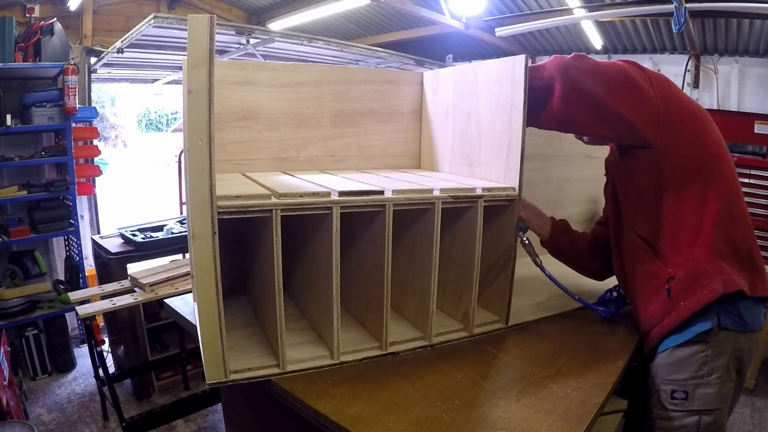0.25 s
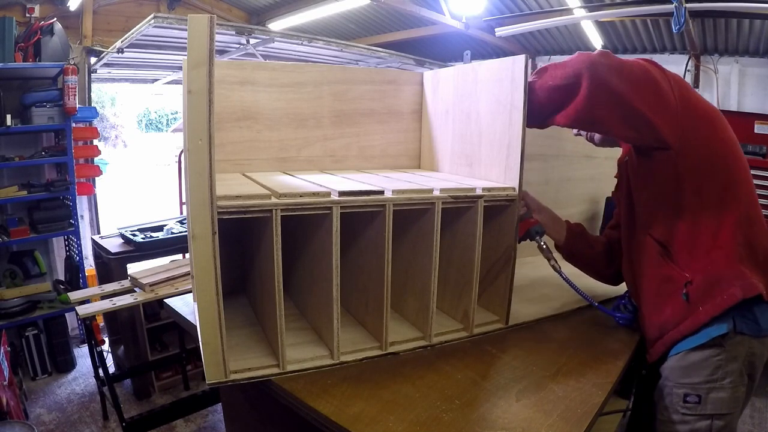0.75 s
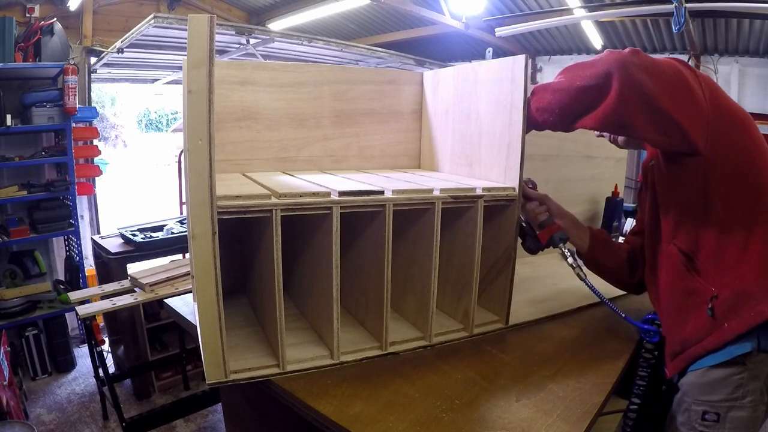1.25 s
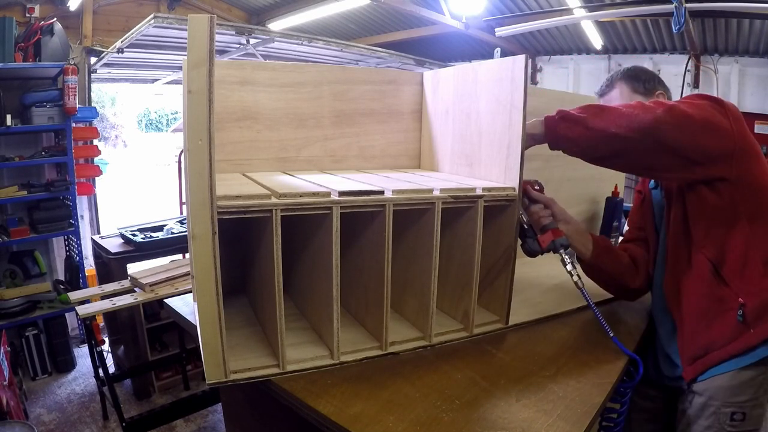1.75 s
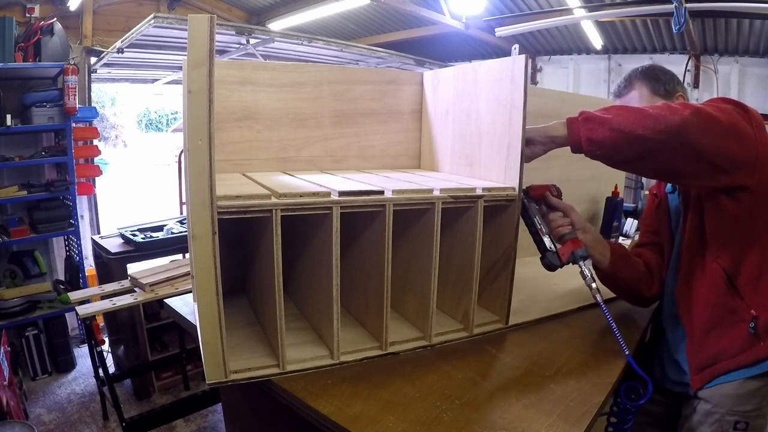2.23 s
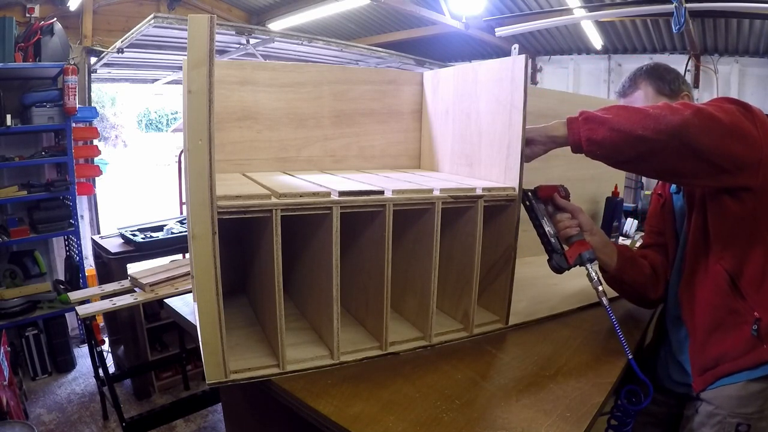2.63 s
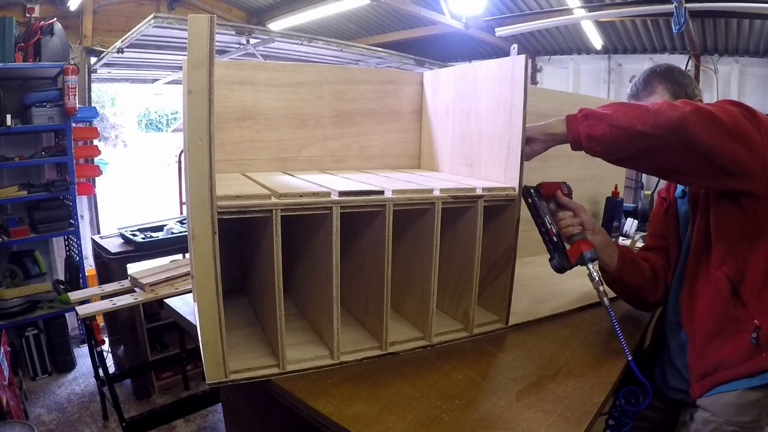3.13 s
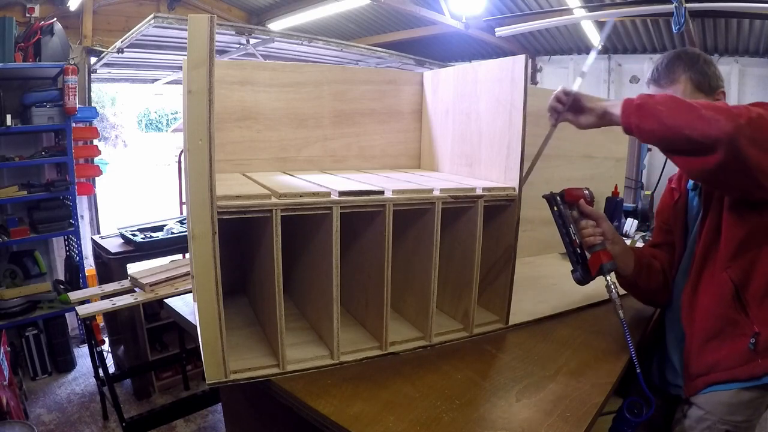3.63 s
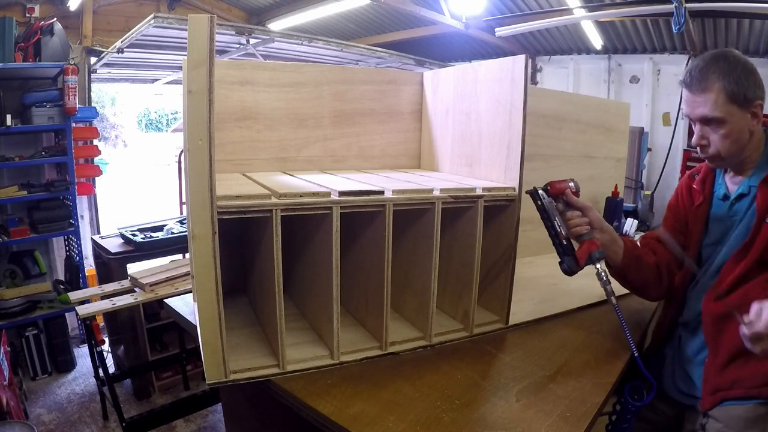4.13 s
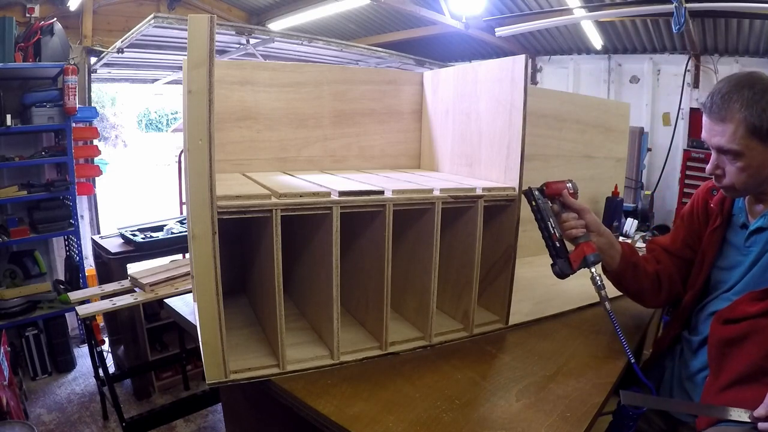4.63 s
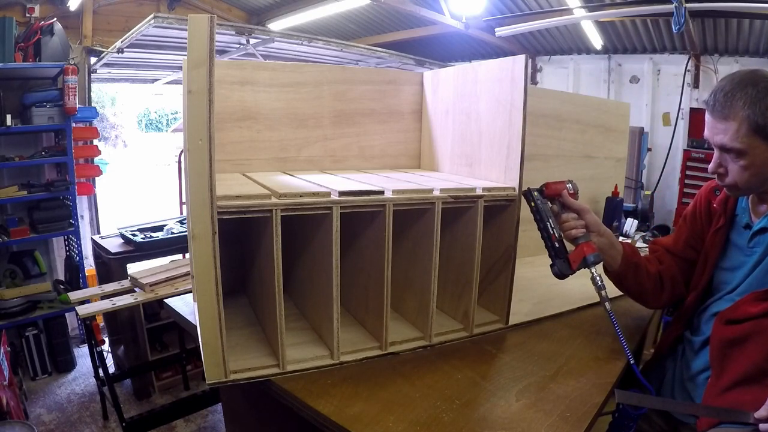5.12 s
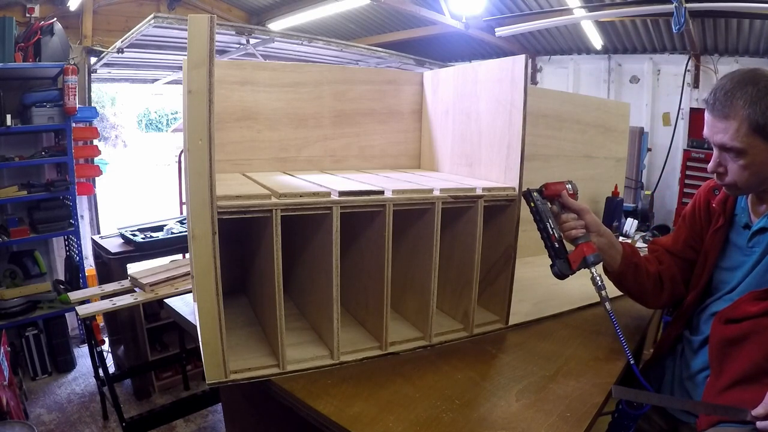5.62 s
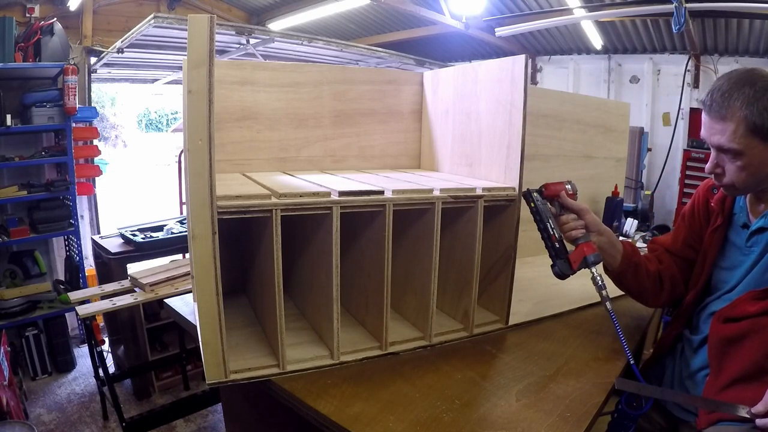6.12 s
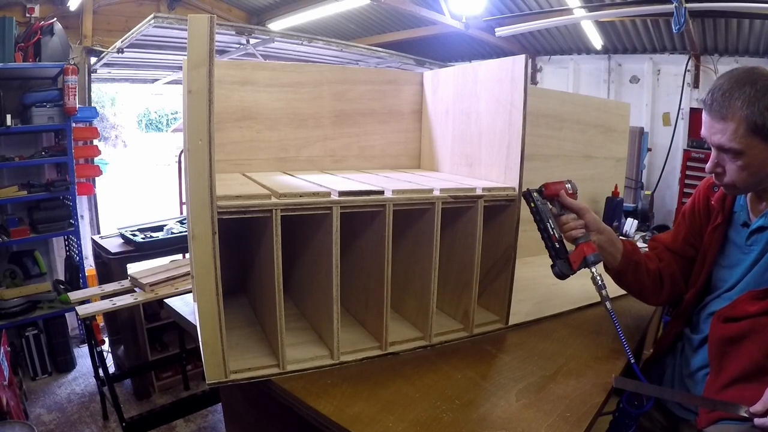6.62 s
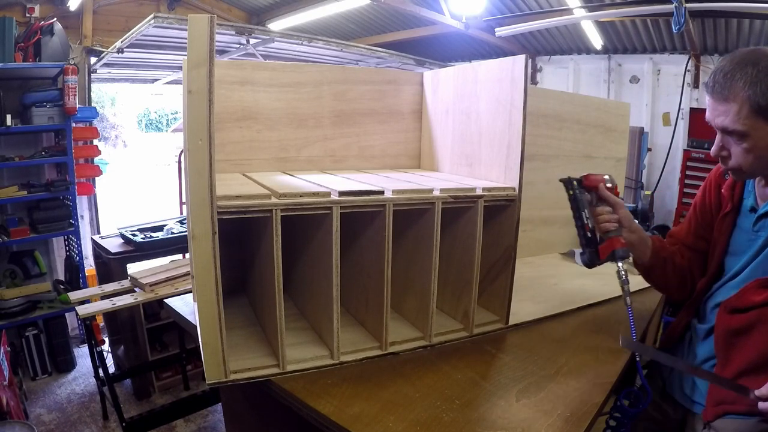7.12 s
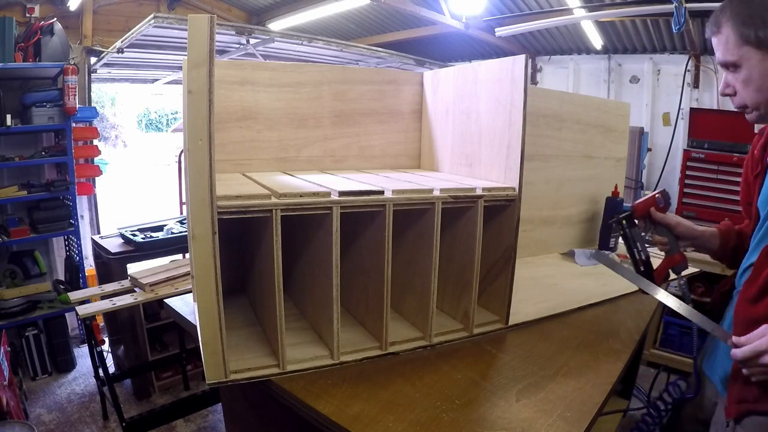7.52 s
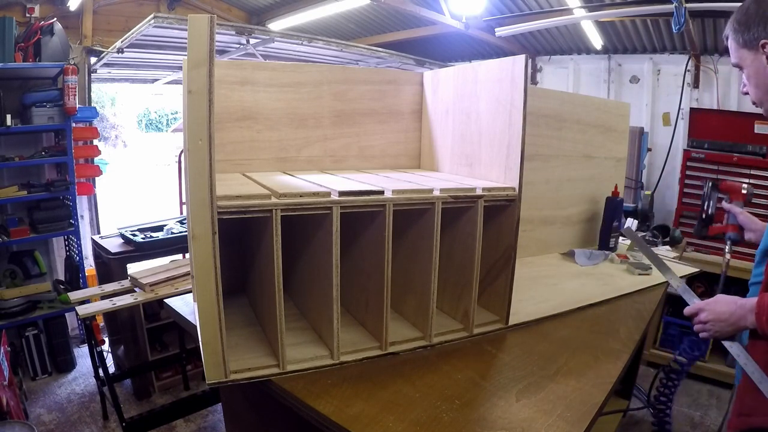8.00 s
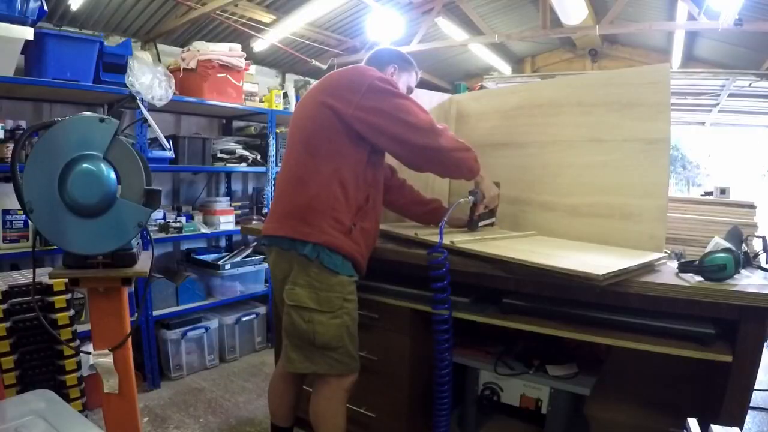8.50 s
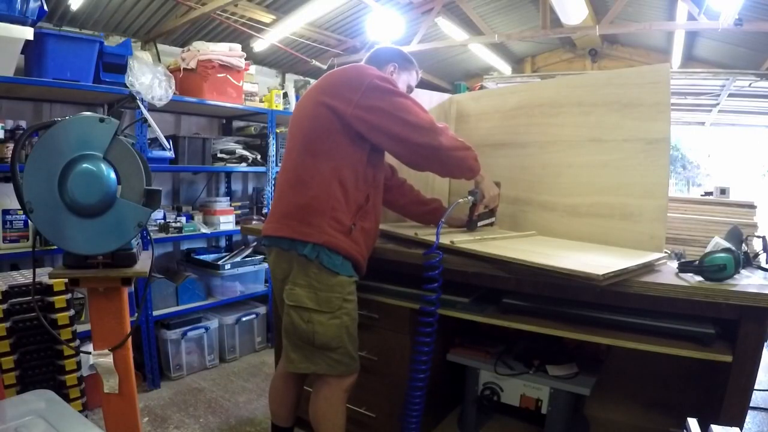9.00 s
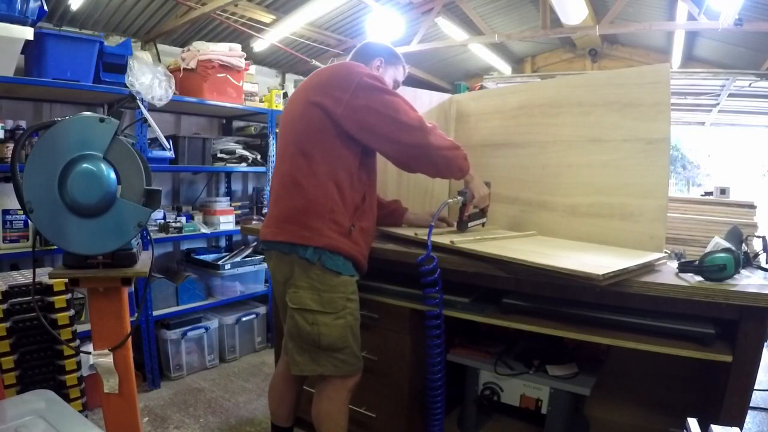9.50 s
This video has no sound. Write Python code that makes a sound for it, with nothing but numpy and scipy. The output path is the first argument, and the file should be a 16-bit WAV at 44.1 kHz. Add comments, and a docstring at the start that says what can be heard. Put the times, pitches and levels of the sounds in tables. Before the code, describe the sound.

Close to a workshop bench, a pneumatic nailer lets out a burst of air, then fires five hard cracks about half a second apart, each followed by a hissing puff and knock. Short wood scrapes fall between. A steel rule rattles on plywood, soft bumps follow, then one more shot and a sharp metal click. The microphone then jumps across the room for two duller shots.

```python
"""Small workshop, one microphone a few steps from the bench: an air-powered pin nailer fixes plywood.
A release opens: valve hiss, a dump of coloured noise with a low puff, then the piston's knock. A soft bump follows,
then five shots: enveloped noise cracks with damped modes of nailer and panel, releases and stick-slip scrapes between.
From 3.5 s a steel rule chatters in runs of slaps and pings; bumps, a sixth shot, faint cloth and metal clicks follow.
From 8.46 s the microphone is across the room: quieter air, more bumps, another release and two duller last shots."""
import sys
import numpy as np
from scipy import signal
from scipy.fft import rfft, irfft
from scipy.io import wavfile

SR = 44100
rng = np.random.default_rng(int(sys.argv[2]) if len(sys.argv) > 2 else 0)


def store_wav(level_fs):
    """Save 16-bit WAV to argv[1]."""
    pcm = np.round(np.clip(np.atleast_2d(level_fs), -1, 1) * 32767)
    wavfile.write(sys.argv[1], SR, pcm.T.astype(np.int16))


N = 429975
AGE = np.arange(32768) / SR  # clock of one event, s
MOVE_S = 8.46  # from here on the microphone is across the room
TOP_HZ = 15400  # upper limit of the microphone

# All levels are relative to the layer they belong to; spectra give shape only.
# Steady air of the workshop, beside the bench and across the room: [f/Hz, level/dB per Hz]
NEAR_AIR_SPECTRUM = [(12, -29), (20, 0), (64, -3), (76, -8.5), (108, -6.5), (132, -16), (223, -14.5),
                     (286, -14), (540, -19.5), (638, -18), (1170, -17.5), (4310, -25.5), (15000, -42)]
FAR_AIR_SPECTRUM = [(12, -29), (20, -10), (135, -18), (249, -27.5), (286, -31.5), (733, -35), (2930, -41),
                    (3270, -40.5), (15000, -53)]
NEAR_AIR_DB, FAR_AIR_DB = -54.5, -55
# Decay of the workshop: [f/Hz, t60/s]
ROOM_T60 = [(60, 0.66), (150, 0.5), (400, .36), (1000, .33), (3000, 0.31), (6000, 0.27), (10000, .25),
            (15000, 0.11)]
# Low resonances of bench and room, beside the bench and across the room: [f/Hz, level/dB, t60/s]
NEAR_BOOM = [(42, -9.5, 0.55), (58.4, -4, .9), (65.2, -2.5, 1.6), (71.5, -6, 0.88), (121, -15.5, 0.67),
             (141, -6.5, .25), (200, -9.5, .5)]
FAR_BOOM = [(58.4, -18, .4), (84.8, 2.5, 0.83), (133, -4.5, 0.47), (175.7, -1, 0.34)]

# Exhaust on trigger release: [t/s, air thump level/dB, valve opening time/s]
RELEASES = [(-.009, -13.5, .017), (.486, -15.5, 0.0074), (1.035, -15, 0.0079), (1.461, -14.5, 0.0082),
            (1.91, -17.5, .01), (2.385, -19, .023), (6.964, -14.5, .013), (9.088, -21.5, .003)]
# Pilot air, escaping air, piston at its top stop, low puff: [f/Hz, level/dB per Hz]
VALVE_SPECTRUM = [(100, -8), (1500, -16), (2300, -12), (3200, 1), (6000, -1), (10000, -5.5), (15000, -11)]
EXHAUST_SPECTRUM = [(60, -6.5), (250, -9), (550, -21), (850, -8.5), (1800, -8), (2600, -1.5), (5500, 0.5),
                    (8000, -3), (11000, -6.5), (15000, -10.5)]
KNOCK_SPECTRUM = [(60, -7.5), (350, 3), (560, -4.5), (850, 1.5), (1600, -5.5), (3000, -13), (6000, -16.5),
                  (15000, -29.5)]
PUFF_SPECTRUM = [(25, -10), (60, 0.5), (104, -9.5), (135, 1.5), (180, -5.5), (350, -10), (600, -28),
                 (2000, -51.5)]
# Every release dumps the same charge of air, dB
EXHAUST_DB, KNOCK_DB, NEAR_DUMP_BOOM_DB, FAR_DUMP_BOOM_DB = -11, -18, -24, -18.5

# Soft bumps on the carcass: [t/s, level/dB, thud f/Hz, boom level/dB]
BUMPS = [(.175, -41.5, 198, -3), (4.717, -37.5, 163, -5.5), (5.13, -40, 169.4, -8), (8.565, -38.5, 245, 2),
         (9.426, -39.5, 222.8, 2), (9.511, -58.5, 214, 10.5)]

# Driver blows: [t/s, level/dB, give of the panel/dB, struck spot f/Hz, metallic ring f/Hz, valve opening time/s]
SHOTS = [(.340, -7, -0.5, 668, 2740, 0.014), (.880, -6.5, -0.5, 702.5, 2640, 0.016),
         (1.307, -6, -1.5, 456.2, 4283, 0.015), (1.763, -6.5, -4.5, 1040, 2690, 0.017),
         (2.199, -7, -6.5, 351.5, 3414, .004), (6.832, -7, -5.5, 1175, 3637, 0.018),
         (8.974, -6, -5, 881, 1346, .018), (9.647, -6, -6.5, 450, 1710, 0.02)]
# Crack of a blow: [f/Hz, level/dB per Hz]
CRACK_SPECTRUM = [(40, -14.5), (110, -8), (200, -1), (430, -2), (550, -8), (760, -2.5), (1300, -2),
                  (1700, -5), (2200, -2), (2700, -0.5), (4500, -1), (7000, -6.5), (10000, -14.5),
                  (15000, -21.5)]
# Plywood carcass and nailer body under a blow: [f/Hz, level/dB, t60/s]
PANEL_MODES = [(159.4, -17.5, 0.19), (179.5, -18, 0.66), (231.6, -22.5, 0.13), (247, -21.5, .2),
               (316, -18, 0.47), (346.4, -20, 0.53), (378, -18, 0.33), (473.6, -21, 0.45),
               (869.5, -22.5, .13)]
NAILER_MODES = [(1230, -20.5, 0.084), (1365, -21, 0.28), (2520, -16.5, .22), (2610, -20, 0.18),
                (3090, -23, 0.25), (3680, -19.5, .28), (4240, -19.5, .25), (4930, -22.5, 0.18),
                (5850, -25, 0.25), (7480, -26.5, .28)]
# A shot beside the bench and across the room: [room level/dB, boom level/dB, extra treble tilt/dB per octave]
NEAR_SHOT = (-6.5, -27, 0)
FAR_SHOT = (-4.5, -20.5, -1.4)
# A spot that gives sounds dull and sings its own note; a stiff one sounds bright
CRACK_TILT_DB, TILT_PER_GIVE = -1.3, -0.37  # dB per octave; the same per dB of give
SPOT_DB, SPOT_PER_GIVE, SPOT_T60 = -4.5, 0.81, .14  # dB; dB per dB of give; s
METAL_DB, METAL_T60 = -7.5, .13  # the nailer's loudest ring: dB; s
STROKE_SHARE = 0.58  # the piston lands later by this share of the valve opening time

# Wood rubbed by the nose or the rule:
# [t/s, length/s, level/dB, treble tilt/dB per octave, groan f/Hz, groan level/dB]
SLIDES = [(0.662, .11, -41, 0.5, 447, -5.5), (0.771, .075, -46, -4.5, 686, -6),
          (1.203, 0.037, -39, -5, 710, -0.5), (1.609, .11, -42, -4, 844, -5.5),
          (3.466, 0.27, -48.5, -6.5, 264, -3), (4.072, .04, -46, -2, 420, -7)]
# Nose or rule on wood: [f/Hz, level/dB per Hz]
SCRAPE_SPECTRUM = [(100, -4), (300, -7.5), (450, 4.5), (600, -4), (900, 4), (2000, -3.5), (3000, 1),
                   (4300, 0.5), (6000, -12), (8000, -24.5), (15000, -41)]

# Runs of the steel rule on plywood:
# [first slap t/s, length/s, time between slaps/s, level/dB, panel boom level/dB]
CHATTERS = [(3.497, 0.32, .0387, -41.5, -36.5), (3.919, 0.035, .05, -46, -49),
            (3.986, .27, .0485, -42, -51.5)]
# One slap: [f/Hz, level/dB per Hz]
SLAP_SPECTRUM = [(60, -9), (250, 9.5), (450, -6.5), (680, 0.5), (1100, -9), (1600, -7.5), (3500, -14),
                 (7000, -24.5), (15000, -48)]
# The rule and the board that it slaps: [f/Hz, level/dB, t60/s]
RULE_MODES = [(418, -10.5, 0.32), (687, -15, 0.28), (1022, -11.5, 0.14), (1580, -4, 0.065),
              (1760, -8, 0.083), (1920, -22, 0.089)]
# A run swells, then dies away and grows duller
CHATTER_PEAK = 0.29  # share of the run at which the rule bounces hardest
CHATTER_SAG_DB, CHATTER_JITTER_S = 15, .001  # nominal loss from peak to end of run; timing scatter
CHATTER_TILT_DB, CHATTER_DULL_DB = 1.5, 1  # dB per octave: first tilt; loss over a whole run

# Light steel pings: [t/s, level/dB]
PINGS = [(3.99, -46.5), (7.936, -57), (8.015, -57)]
# Sleeve and hose brush past each other: [t/s, length/s, level/dB]
RUSTLES = [(7.28, .25, -64.5), (7.89, .11, -60.5), (8.3, .16, -61.5)]
# Cloth: [f/Hz, level/dB per Hz]
CLOTH_SPECTRUM = [(300, -20), (2000, -12), (4500, 2), (6500, -3), (8700, -4), (11000, -14), (15000, -14)]
# Metal clicks as the nailer is put aside: [t/s, level/dB]
CLICKS = [(7.543, -25.5), (7.931, -52)]
# Click of metal: [f/Hz, level/dB per Hz]
CATCH_SPECTRUM = [(200, -12), (1800, -23), (3000, -3), (4500, -9.5), (7000, 1), (9000, -6), (12000, -5),
                  (15000, -10)]


def amp(db):
    """Decibels to gain."""
    return 10 ** (np.asarray(db) / 20)


def lookup(points, hz):
    """Read a table on a log-frequency axis."""
    f, value = np.transpose(points)
    return np.interp(np.log(np.maximum(hz, 1)), np.log(f), value)


def fade(t60):
    """Exponential decay, 60 dB in t60 seconds."""
    return np.exp(-np.log(1000) * AGE / max(t60, 1e-3))


def swell(rise):
    """Smooth onset over about rise seconds."""
    return 1 - np.exp(-(AGE / max(rise, 1e-4)) ** 2)


def add(out, s, sound):
    """Mix a sound in at time s, trimmed to the length of the scene."""
    i = int(s * SR)
    sound = sound[max(-i, 0):N - i]
    start = max(i, 0)
    out[start:start + len(sound)] += sound


def colour(x, spectrum, tilt_db=0, size=4096):
    """Causal minimum-phase filter with the given spectrum and unit power gain."""
    hz = np.maximum(np.arange(size // 2 + 1) * SR / size, 20)
    level_db = lookup(spectrum, hz) + tilt_db * np.log2(hz)
    cepstrum = irfft(np.log(amp(level_db)))
    # folding the cepstrum forward in time makes the filter causal
    cepstrum[1:size // 2] *= 2
    cepstrum[size // 2 + 1:] = 0
    response = irfft(np.exp(rfft(cepstrum)))
    return signal.fftconvolve(x, response / np.linalg.norm(response))[:len(x)]


def grit(grain_s, spread_db):
    """Noise whose strength wanders from grain to grain; rms 1."""
    knots = np.arange(len(AGE))
    level_db = spread_db * np.interp(AGE / grain_s, knots, rng.standard_normal(len(AGE)))
    x = rng.standard_normal(len(AGE)) * amp(level_db)
    return x / x.std()


def ring(modes, detune=0.0074):
    """Damped modes, slightly detuned and with new phases at every strike."""
    out = np.zeros(len(AGE))
    for hz, db, t60 in modes:
        shift, phase = rng.standard_normal(2)
        out += amp(db) * fade(t60) * np.sin(2 * np.pi * (hz * (1 + detune * shift) * AGE + phase))
    return out


def room(noise, ripple_hz=35, ripple_db=4):
    """Workshop tail: some frequencies ring more than their neighbours, and the treble dies first."""
    spectrum = rfft(noise)
    hz = np.arange(len(spectrum)) * SR / len(noise)
    ripple = amp(ripple_db * np.interp(hz / ripple_hz, np.arange(len(hz)), rng.standard_normal(len(hz))))
    spectrum = spectrum * ripple / np.sqrt(np.mean(ripple ** 2))
    centres = np.transpose(ROOM_T60)[0]
    tail = np.zeros(len(noise))
    # overlapping bands that add up to the whole, each with its own decay
    for share, (_, t60) in zip(np.eye(len(centres)), ROOM_T60):
        band = irfft(spectrum * lookup(np.c_[centres, share], hz))
        tail += band * fade(t60)
    return swell(0.011) * tail


def burst(spectrum, rise, t60, room_db, tilt_db=0):
    """A short noisy event with its room tail."""
    direct = grit(.0007, 1.1) * swell(rise) * fade(t60)
    tail = amp(room_db) * room(grit(0.0011, 0.69))
    return colour(direct + tail, spectrum, tilt_db)


def boom(s):
    """Low resonances of bench and room that reach the microphone where it is at time s."""
    return ring(NEAR_BOOM if s < MOVE_S else FAR_BOOM) * swell(0.012)


def air():
    """Steady workshop rumble and hiss as coloured noise, quieter across the room."""
    near = amp(NEAR_AIR_DB) * colour(rng.standard_normal(N), NEAR_AIR_SPECTRUM)
    far = amp(FAR_AIR_DB) * colour(rng.standard_normal(N), FAR_AIR_SPECTRUM)
    return np.where(np.arange(N) / SR < MOVE_S, near, far)


def valve(out, s, lead, db):
    """Pilot air hisses for a moment before the main valve flips at time s."""
    gate = np.minimum(AGE / 0.0073, 1) * (AGE < lead + .003)
    hiss = colour(grit(0.00073, 0.92) * gate, VALVE_SPECTRUM)
    add(out, s - lead, amp(db) * hiss)


def surge(hz=68, echo_s=.033, echo_db=-4):
    """Escaping air first pushes, then sucks back; the wave returns once from the far wall."""
    wave = np.cos(2 * np.pi * hz * AGE) * swell(.001) * fade(.065)
    return wave + amp(echo_db) * np.interp(AGE - echo_s, AGE, wave, left=0)


def releases(return_s=.02):
    """Air dumps from the cylinder with a hiss and a low puff; the piston hits its top stop just after."""
    out = np.zeros(N)
    for s, thump_db, lead in RELEASES:
        boom_db = NEAR_DUMP_BOOM_DB if s < MOVE_S else FAR_DUMP_BOOM_DB
        valve(out, s, lead, db=-31.5)
        add(out, s, amp(EXHAUST_DB) * burst(EXHAUST_SPECTRUM, rise=0.0017, t60=0.15, room_db=-6))
        puff = burst(PUFF_SPECTRUM, rise=0.0015, t60=0.051, room_db=-5.0)
        thump = amp(2.0) * surge() + amp(-2.5) * puff
        add(out, s, amp(thump_db) * thump + amp(boom_db) * boom(s) * fade(1.0))
        knock = burst(KNOCK_SPECTRUM, rise=0.00049, t60=0.11, room_db=-8.5)
        stop = knock + amp(-1.5) * ring(NAILER_MODES)
        add(out, s + return_s, amp(KNOCK_DB) * stop)
    return out


def bumps():
    """Soft bumps on the carcass: a dull noise thud, its note and octave, and the boom beneath."""
    out = np.zeros(N)
    for s, db, hz, boom_db in BUMPS:
        spectrum = [(hz / 4, -8), (hz / 2, -3), (hz, 0), (hz * 1.4, -3),
                    (hz * 3.4, -20), (hz * 4, -32), (hz * 10, -55)]
        note = ring([(hz, 3, .28), (2 * hz, -1, .14)]) * swell(0.012)
        thud = amp(-2.0) * burst(spectrum, rise=0.0019, t60=0.2, room_db=-4.5) + note
        add(out, s, amp(db) * (thud + amp(boom_db) * boom(s)))
    return out


def driver(impact_s, impact_width_s=.0052, contact_db=-9, echo_t60=0.078):
    """Strength of one blow: first contact, then the pin bites and the piston hits its bumper; echoes linger."""
    impact = np.exp(-((AGE - impact_s) / impact_width_s) ** 2)
    return swell(.0008) * (amp(-1.54) * impact + amp(contact_db) * fade(echo_t60))


def shots(alike=0.56, partial_db=-25, partial_t60=0.24, count=24):
    """The driver hammers the pin in; nailer and panel ring and the cabinet walls throw the crack about."""
    out = np.zeros(N)
    # the nailer hardly moves, so a share (alike) of the echo power has the same pattern in every shot
    near_paths, far_paths = grit(0.00041, 2), grit(.0008, 2.7)  # panels nearby, walls further off
    for s, db, give_db, spot_hz, metal_hz, lead in SHOTS:
        room_db, boom_db, distance_tilt_db = NEAR_SHOT if s < MOVE_S else FAR_SHOT
        tilt_db = CRACK_TILT_DB + TILT_PER_GIVE * give_db + distance_tilt_db
        valve(out, s, lead, db=-29.0)
        near = np.sqrt(alike) * near_paths + np.sqrt(1 - alike) * grit(0.00063, 1.5)
        far = np.sqrt(alike) * far_paths + np.sqrt(1 - alike) * grit(0.00063, 1.5)
        blow = near * driver(STROKE_SHARE * lead)
        crack = colour(blow + amp(room_db) * room(far), CRACK_SPECTRUM, tilt_db)
        # magazine, housing and board add a crowd of weaker partials
        partials = [(hz, partial_db, partial_t60) for hz in rng.triangular(1000, 3000, 9000, count)]
        metal = ring(NAILER_MODES + partials + [(metal_hz, METAL_DB, METAL_T60)], detune=.005)
        spot = ring([(spot_hz, SPOT_DB + SPOT_PER_GIVE * give_db, SPOT_T60)], detune=0.0018)
        wood = amp(give_db) * ring(PANEL_MODES, detune=0.0091) + spot
        add(out, s, amp(db) * (crack + (metal + wood) * swell(.003) + amp(boom_db) * boom(s)))
    return out


def slides():
    """Nose or rule sticks and slips over the grain and sets one note of the board groaning."""
    out = np.zeros(N)
    for s, length, db, tilt_db, hz, groan_db in SLIDES:
        pressure = swell(0.016) / (1 + np.exp(np.minimum((AGE - length) / .008, 50)))
        slips = grit(0.003, 3.5) * pressure
        board = ring([(hz, 0, .045)])
        groan = signal.fftconvolve(slips, board / np.linalg.norm(board))[:len(AGE)]
        scrape = colour(slips, SCRAPE_SPECTRUM, tilt_db)
        add(out, s, amp(db) * (scrape + amp(groan_db) * groan))
    return out


def chatter_slaps(boom_sag_db=6):
    """Nearly even bounces of the springy rule: list of (t/s, level/dB, boom/dB, tilt/dB per octave)."""
    slaps = []
    for start, length, interval, db, boom_db in CHATTERS:
        for age in np.arange(0, length, interval):
            spent = age / length
            sag = ((spent - CHATTER_PEAK) / (1 - CHATTER_PEAK)) ** 2
            s = start + age + CHATTER_JITTER_S * rng.standard_normal()
            tilt_db = CHATTER_TILT_DB - CHATTER_DULL_DB * spent
            slaps.append((s, db - CHATTER_SAG_DB * sag, boom_db - boom_sag_db * sag, tilt_db))
    return slaps


def chatter():
    """The steel rule slaps the plywood: noise bursts, ringing rule and board, and a low flex."""
    out = np.zeros(N)
    # each slap bends the board the same way, so quick slaps build up its lowest note
    flex = amp(2.0) * np.cos(2 * np.pi * 57 * (AGE - .004)) * swell(0.0029) * fade(.13)
    for s, db, boom_db, tilt_db in chatter_slaps():
        contact = burst(SLAP_SPECTRUM, rise=0.00079, t60=0.043, room_db=-7.5, tilt_db=tilt_db)
        slap = amp(3.5) * contact + ring(RULE_MODES) * swell(0.0015)
        add(out, s, amp(db) * slap + amp(boom_db) * (boom(s) * fade(0.99) + flex))
    return out


def pings():
    """Light steel pings: two close, high damped modes."""
    out = np.zeros(N)
    for s, db in PINGS:
        steel = ring([(7310, 5.5, 0.26), (7500, -8.0, .2)], detune=0.0011)
        add(out, s, amp(db) * steel * swell(0.0034))
    return out


def rustles():
    """Cloth swishes swell and fade as the arm moves: grainy noise follows its speed."""
    out = np.zeros(N)
    for s, length, db in RUSTLES:
        speed = np.sin(np.pi * np.minimum(AGE / length, 1))
        add(out, s, amp(db) * colour(grit(.006, 2) * speed, CLOTH_SPECTRUM))
    return out


def clicks():
    """Sharp metal clicks: a bright noise burst over two faint high modes."""
    out = np.zeros(N)
    for s, db in CLICKS:
        catch = burst(CATCH_SPECTRUM, rise=0.0015, t60=0.072, room_db=-12.0)
        add(out, s, amp(db) * (catch + ring([(6860, -21, 0.2), (12300, -23, 0.25)])))
    return out


def scene():
    """All sources at one microphone."""
    tool = releases() + shots()
    touches = bumps() + slides() + chatter() + pings() + rustles() + clicks()
    return (air() + tool + touches)[None]


def record(dry, ceiling=0.99):
    """The microphone rounds off the loudest peaks and the top is cut."""
    rounded = dry / (1 + (dry / ceiling) ** 6) ** (1 / 6)
    lowpass = signal.ellip(10, .2, 70, TOP_HZ, fs=SR, output="sos")  # ripple and stopband in dB
    return signal.sosfilt(lowpass, rounded)


dry = scene()
out = record(dry)
store_wav(out)
```